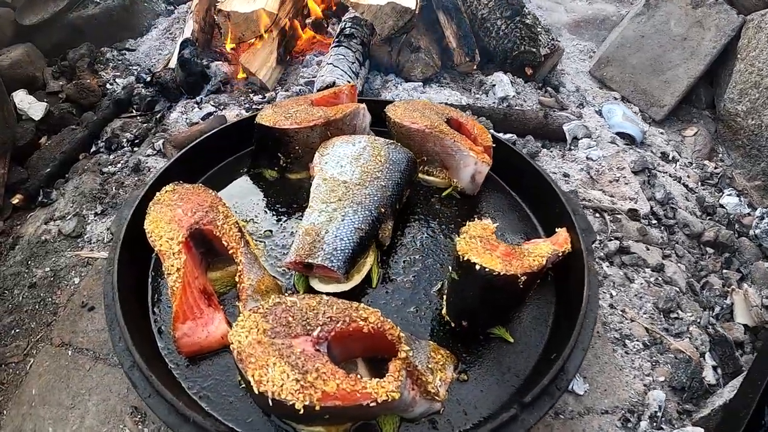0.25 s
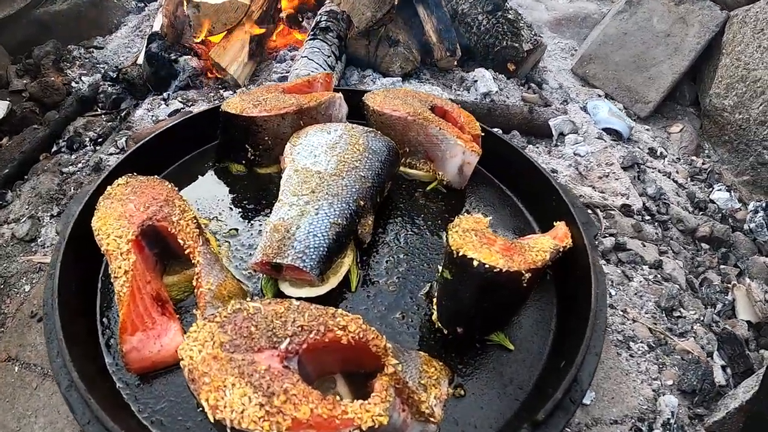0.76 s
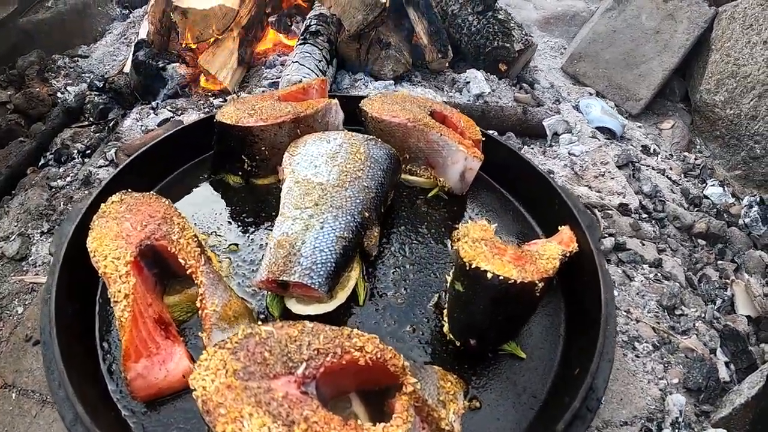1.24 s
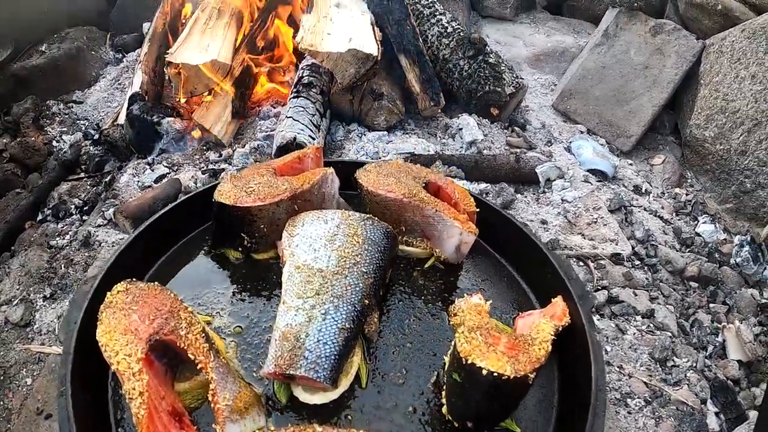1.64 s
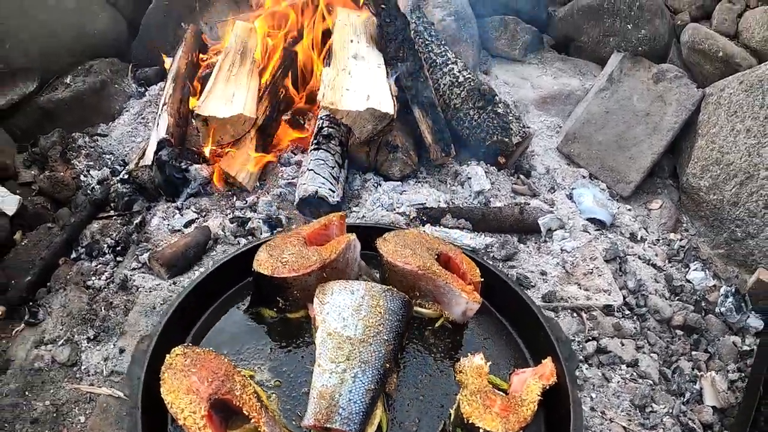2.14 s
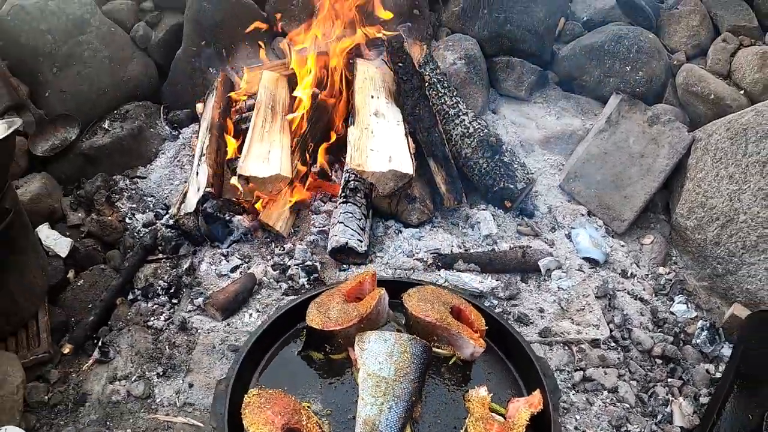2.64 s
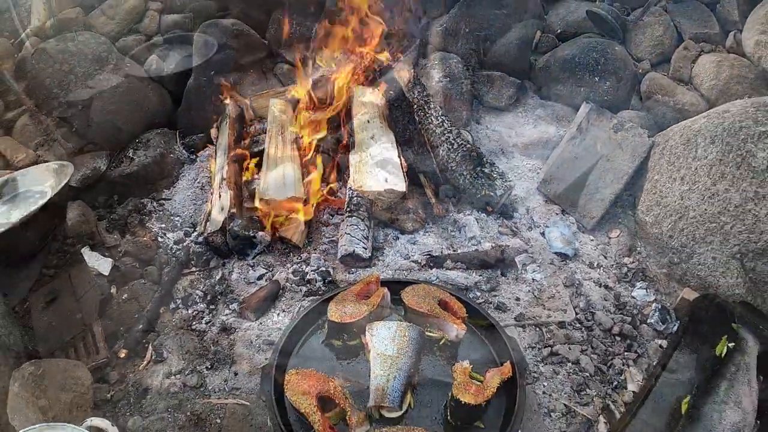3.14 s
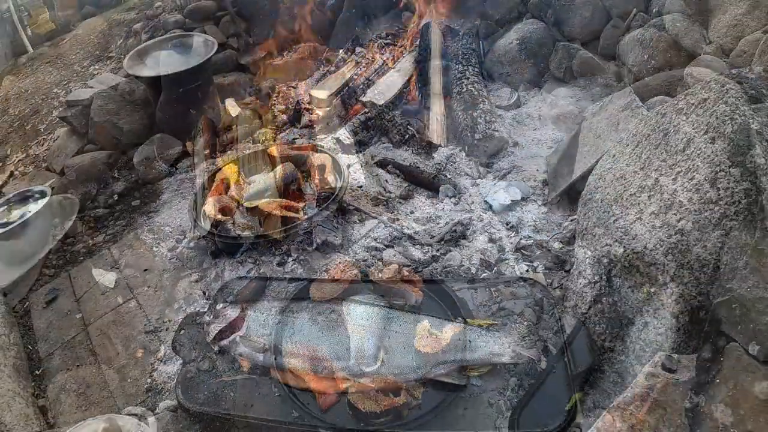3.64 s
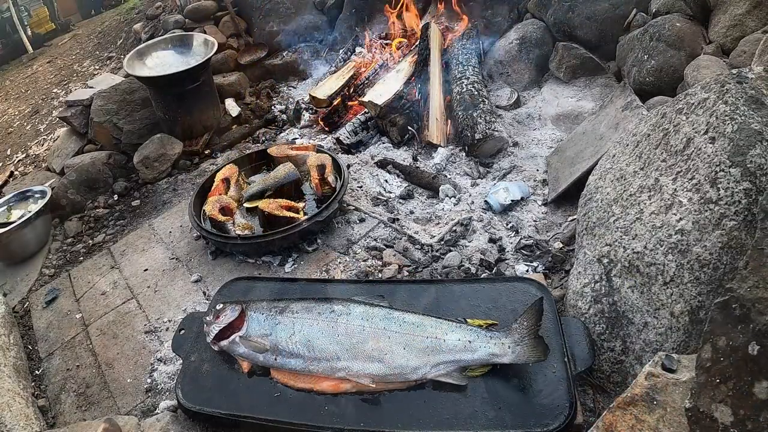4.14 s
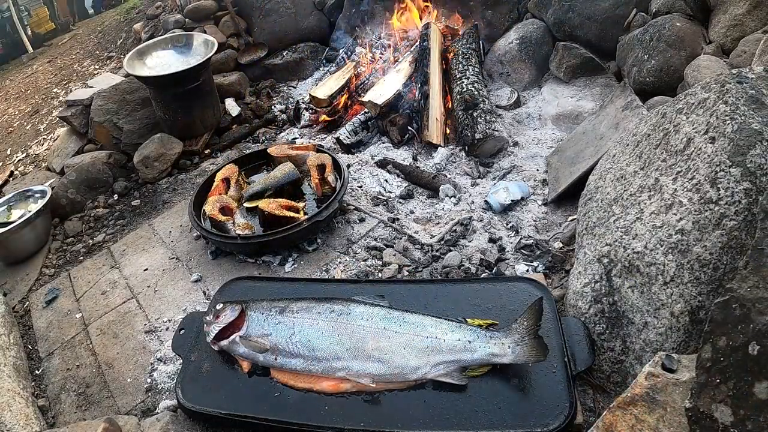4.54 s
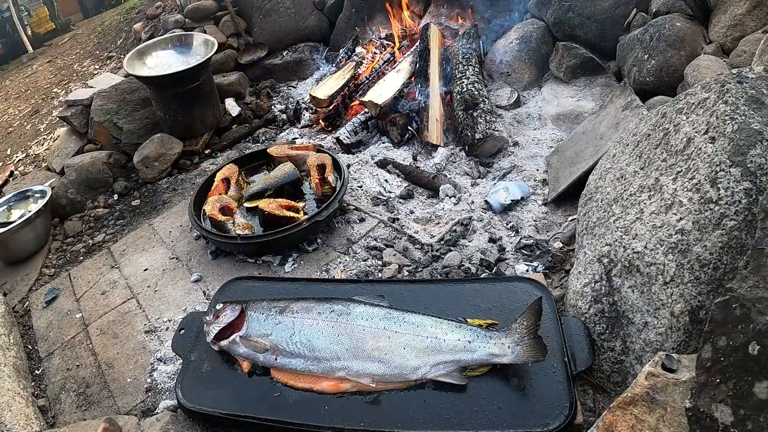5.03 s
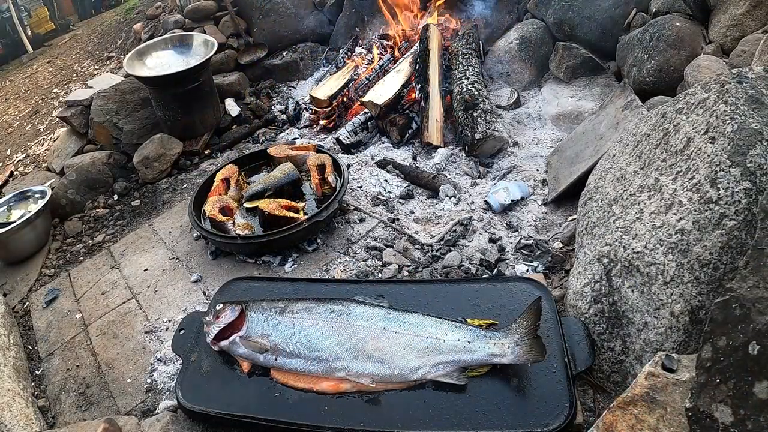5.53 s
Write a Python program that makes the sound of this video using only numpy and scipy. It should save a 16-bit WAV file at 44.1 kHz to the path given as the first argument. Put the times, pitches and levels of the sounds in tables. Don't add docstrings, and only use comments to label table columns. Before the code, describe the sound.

Fish fries in a pan beside a wood fire outdoors, picked up closely by a small stereo microphone. A dense, bright sizzle runs the full 5.8 seconds, grainy with bursting bubbles and brief flurries of spitting fat. Low wind and flame flutter rumbles underneath, with stronger flaps near 0.2, 1.5, 2.0 and 4.6 s. A crisp pop lands at 0.4 s, then small spits tick until a snap at 1.7 s. Pops gather at 2.7-2.85 s, and at 3.04 s a huge, clipped crack bursts with a tiny high squeak; the sound ducks sharply, then recovers. From about 3.7 to 4.5 s the scene fades closer to the logs. Bright snaps cluster at 4.3-4.45 s, a faint low squeak comes at 4.6 s, and steam hiss swells from 4.5 s, with narrow whistling jets near the end. Woody pops follow at 5.45 s and a loud one at 5.69 s.

```python
import sys
import numpy as np
from scipy import signal
from scipy.fft import rfft, irfft
from scipy.io import wavfile
from scipy.ndimage import uniform_filter1d

SR = 44100
rng = np.random.default_rng(int(sys.argv[2]) if len(sys.argv) > 2 else 0)


def generate_wav(signal):
    frames = np.transpose(np.atleast_2d(signal))
    scaled = np.clip(frames, -1, 1) * 32767
    pcm = np.round(scaled).astype(np.int16)
    wavfile.write(sys.argv[1], SR, pcm)


def elevation(decibels):
    levels = np.asarray(decibels, float)
    return 10 ** (levels / 20)


N = 254898


def fry():
    # hz, density_db (per Hz)
    fry_colour = [(180, -33), (300, -13.5), (793, -13), (987, -5), (1110, -5), (1290, 3), (1800, -0.5),
                  (1960, 2.5), (2170, -0.5), (2840, 2), (4030, 0.5), (4610, 0.5), (12000, -16.5),
                  (15400, -25), (16500, -68)]
    level_db, bright_db, low_db = pan_controls()
    low_db = np.minimum(low_db, -7) + 20.5
    bed = hiss(fry_colour, bright_db, low_db, flicker_db=1.07, apart=0.54 + 0.12 * first_view())
    bed = bed / np.std(band(bed[0], 760, 9400, order=4))

    s, pitch, cycles, turn, size, pan = rng.random(size=(1400, 6)).T[:, :, None]
    hz = 1800.0 * 5.0 ** pitch
    bubble_db = -1.5 + 1.2 * np.log2(hz / 3000) + np.minimum(-4.0 * np.log(size), 13)
    blips = wavelet(hz, 0.5 + 1.13 * cycles, turn, size=96) * elevation(bubble_db)
    side_db = 7.5 * (pan - 1.0)
    left = scatter(s * N / SR, blips * elevation(side_db))
    right = scatter(s * N / SR, blips * elevation(-side_db))
    return elevation(level_db + 1.5) * (bed + np.array([left, right]))


def pan_controls():
    # time_s, sizzle_db, brightness_db_per_octave, low_end_db
    drift = [(0, -41, -4.5, -13), (1.0, -41, -1.5, -13.5), (1.7, -40.5, -2, -5.5), (2.3, -42, -2, -28),
             (3.0, -42, -5, -36), (3.25, -42.5, -3, -30), (3.7, -44, -8, -23), (4.3, -42.5, -3, -17),
             (5.0, -43.5, 0, -19.5), (5.78, -43.5, 2, -18)]
    # start_s, length_s, louder_db, brighter_db_per_octave, fuller_low_end_db
    flurries = [(0.0, 0.038, 2.5, 0, 16.5), (0.486, 0.026, 0.5, -3, 10), (1.37, 0.046, 0.5, 3, 7),
                (1.454, 0.058, 0, 0, 13), (1.724, 0.057, 1, 2, 10), (1.962, 0.025, 1, 1, 1),
                (2.075, 0.056, 3, -2, 5), (3.39, 0.023, 5, 3, 20), (3.63, 0.025, 0, -7, 16),
                (4.405, .05, 1.5, 12, 3), (4.595, 0.021, 7.5, -4, 6), (5.052, 0.12, 2.5, 0, 6),
                (5.463, 0.054, 7, 4, 12), (5.66, 0.092, 0.5, 7, 4.5)]
    t = np.arange(N) / SR
    bumps = 0
    for s, length_s, *more in flurries:
        bumps = bumps + np.exp(-((t - s) / length_s) ** 2 * 2) * np.array(more)[:, None]
    level_db, bright_db, low_db = np.array(curve(drift)) + bumps
    return level_db + duck_db(), bright_db, low_db


def hiss(colour, bright_db, low_db, flicker_db, apart):
    hz = np.maximum(np.fft.rfftfreq(N, 1 / SR), 1)
    at_hz, db = np.transpose(colour)
    shape_db = np.interp(np.log(hz), np.log(at_hz), db, left=-70, right=-70)
    spec = rfft(rng.standard_normal((2, N))) * elevation(shape_db)
    out, shared = 0, walk(46)
    for centre in 330 * np.sqrt(2) ** np.arange(12):
        mask = np.cos(np.pi * np.clip(np.log2(hz / centre), -.5, .5)) ** 2
        direct, scattered = irfft(spec * mask, N)
        shared = 0.72 * shared + 0.64 * walk(30)
        tilt_db = bright_db * max(np.log2(centre / 4000), 0) + low_db * (centre < 600)
        level_db = flicker_db * (shared + 1.6 * walk(90)) + tilt_db
        wide = apart * np.clip((centre / 4000) ** 0.69, .4, 1.6)
        ports = (direct + wide * scattered * [[1], [-1]]) / np.sqrt(1 + wide ** 2)
        out = out + elevation(level_db) * ports
    return out


def pops():
    # delay_s, level_db
    echoes = [
        (.0013, -31),
        (.0031, -13),
    ]
    size = 1024
    t = np.maximum(np.arange(size) / SR - .0006, 0)
    s, peak_db, hz, thud_db, snap_db, cycles = all_pops().T[:, :, None]
    g = rng.standard_normal(size=(len(s), 6, size)) * (t > 0)

    thud_noise = to_peak(band(g[:, 4] * np.exp(-t / 0.0011), 250.0, 870.0))
    thud_tone = np.sin(2 * np.pi * 155 * t) * np.exp(-t / 0.0028)
    front = wavelet(hz, cycles, g[:, 5, -1:], size)
    front = front + elevation(thud_db + 6) * (0.81 * thud_noise - 0.94 * thud_tone)
    front = front + 0.16 * wavelet(hz / 2, 1.0, g[:, 5, -4:-3], size)
    front = front + 0.59 * wavelet(np.minimum(1.84 * hz, 9000.), 0.38, g[:, 5, -3:-2], size)
    front = front + elevation(snap_db + 16) * wavelet(6600.0, 0.48, g[:, 5, -2:-1], size)

    out = []
    for port in (0, 1):
        rough = 0.56 * g[:, 0] + 0.87 * g[:, 1 + port]
        ring = wavelet(0.97 * hz, 0.41, 0, size=96)
        tail = signal.fftconvolve(rough * np.exp(-t / 0.00088), ring, axes=1)[:, :size]
        fine = band(rough * np.exp(-t / 0.0023), 3700.0, 8800.0)
        pop = front + 0.28 * to_peak(tail) + elevation(snap_db + 2.5) * to_peak(fine)
        out.append(scatter(s + .0004, elevation(peak_db - 0.5) * pop))
    out = np.array(out)
    reflected = 0
    for delay_s, db in echoes:
        reflected = reflected + elevation(db) * band(np.roll(out, int(delay_s * SR), axis=1), 2800.0, 10000.0, order=1)
    return out + reflected


def all_pops():
    # start_s, peak_db, pitch_hz, thud_db, snap_db
    cracks = [(0.3904, -10, 4860, -23, -16.5), (1.7127, -15.5, 3140, -11, -38),
              (1.9034, -25.5, 3370, -39, 1.5), (2.7464, -14.5, 3660, -53, -18),
              (2.8483, -11.5, 4940, -47, -10.5), (3.0394, 4.5, 3250, -49, -29),
              (3.3832, -17.5, 3260, -18.5, -17), (3.6372, -12.5, 3470, -26.5, -22),
              (4.069, -21.5, 4100, -40, -20), (4.0902, -13, 9900, -50, -28),
              (4.3387, -11.5, 3100, -42, -19), (4.3962, -25, 4340, -30, -8),
              (4.4233, -8.5, 3700, -22.5, -13.5), (4.4263, -18, 9000, -36, -11),
              (4.594, -28.5, 1550, -12.5, -7.5), (4.7117, -17, 1610, -45, -16),
              (4.783, -19, 1930, -37, -14), (4.7923, -25.5, 2180, -36, -4), (5.2447, -18.5, 1920, -44, -38),
              (5.443, -10.5, 1840, -3.5, -17), (5.467, -21, 3520, -9, -8), (5.5052, -10.5, 4740, -47, -12),
              (5.5288, -27, 1830, -29, -7), (5.6856, -0.5, 3600, -35, -16)]
    # start_s, peak_db, pitch_hz, snap_db
    spits = [(0.0737, -29, 2860, -22), (0.448, -20, 3720, -20), (0.6928, -30, 2570, -10),
             (0.779, -22.5, 2600, -14), (0.9707, -28.5, 2960, 1), (1.054, -38, 1460, 0.5),
             (1.1044, -26, 3060, -20), (1.2435, -20, 3020, -26), (1.3328, -26, 3450, -7.5),
             (1.3494, -28, 3490, -3.5), (1.3604, -29, 4860, -5), (1.3765, -17, 4600, -14),
             (1.3865, -30, 9500, -5), (1.4377, -16.5, 5060, -24), (1.5434, -22.5, 3470, -22),
             (1.6267, -26, 1590, -9), (1.689, -30, 3160, -6), (1.75, -31, 3080, -6),
             (1.9397, -25, 2940, -9.5), (1.9681, -19, 5200, -15.5), (2.07, -24, 2100, -23),
             (2.251, -21, 3980, -9), (2.2806, -19.5, 2970, -17), (2.2968, -30, 1380, -8),
             (2.391, -34, 2030, -4), (2.7235, -14.5, 3340, -18), (2.7264, -22.5, 2480, -22),
             (2.7606, -29.5, 1780, -2.5), (2.804, -21, 2460, -17)]
    # start_s, peak_db,
    # pitch_hz
    ticks = [(2.5073, -23.5, 2000), (2.585, -27, 2760), (2.6323, -27, 2030), (2.6662, -27, 3500),
             (2.7697, -25, 2600), (2.886, -33, 3200), (3, -22, 3080), (3.1117, -33.5, 5060),
             (3.2178, -33, 4090), (3.357, -30.5, 1440), (3.475, -30.5, 1930), (3.5503, -38, 5500),
             (3.5995, -29.5, 2090), (3.687, -39, 1410), (3.7215, -36, 11000), (3.7435, -36, 8000),
             (3.901, -22, 7300), (3.9814, -25, 7100), (4.158, -34, 1380), (4.3388, -12, 11000),
             (4.383, -27, 2460), (4.4234, -6, 8500), (4.495, -27, 6000), (4.621, -28, 10500),
             (4.6858, -16.5, 9350), (4.85, -28, 8660), (5.3304, -17, 9340)]
    spit_thud_db, tick_thud_db, tick_snap_db = -27, -37, -38
    rows = list(cracks)
    rows += [(s, db, hz, spit_thud_db, snap_db) for s, db, hz, snap_db in spits]
    rows += [(s, db, hz, tick_thud_db, tick_snap_db) for s, db, hz in ticks]
    rows = np.array(rows)
    cycles = 0.6 + 0.0127 * (rows[:, 1] + 30)
    return np.column_stack([rows, cycles])


def steam():
    # time_s, steam_db, jets_db
    logs = [(3.6, -67.5, -76), (4.07, -57, -73), (4.52, -46.5, -71), (4.82, -47, -76), (4.98, -41.5, -45),
            (5.2, -38, -46), (5.52, -43.5, -49), (5.61, -38, -35.5), (5.78, -36.5, -41)]
    # hz, density_db (per Hz)
    steam_colour = [(1500, -38), (3000, -40), (5000, -3.5), (7000, -1), (9000, 4), (11000, 4),
                    (12500, -1.5), (14000, -8), (15300, -2), (15600, -37)]
    # centre_hz, width_hz, level_db
    jet_bands = [(4170, 660, 4.5), (2030, 490, -5), (8500, 420, -8), (9500, 200, -3), (10900, 390, -13),
                 (5700, 1800, 2)]
    level_db, jet_db = curve([(3.35, -91, -91)] + list(logs))
    broad = unit(hiss(steam_colour, 0, 0, flicker_db=.45, apart=.03))
    jets = 0
    for hz, width_hz, db in jet_bands:
        jet = unit(band(rng.standard_normal(N), hz - width_hz / 2, hz + width_hz / 2))
        jets = jets + elevation(db + 2.4 * walk(32)) * jet

    s, pitch, turn, size = rng.random(size=(700, 4)).T[:, :, None]
    droplet_db = 5.5 + np.minimum(-4.0 * np.log(size), 12)
    droplets = wavelet(6160.0 * 2.1 ** pitch, 1.0, turn, size=96) * elevation(droplet_db)
    sputter_db = 1.0 * walk(28) + 0.8 * walk(70)
    boiling = broad + scatter(s * N / SR, droplets)
    return elevation(level_db + 3.5 + sputter_db) * boiling + elevation(jet_db - 6) * jets


def squeaks():
    # start_s, length_s, pitch_hz, level_db
    whistles = [
        (3.026, 0.033, 7900, -34),
        (4.618, 0.035, 1864, -38.5),
    ]
    t = np.arange(N) / SR
    out = 0
    for s, length_s, hz, db in whistles:
        swell = np.sin(np.pi * np.clip((t - s) / length_s, 0, 1))
        out = out + elevation(db) * swell * np.sin(2 * np.pi * hz * t)
    return out


def wind():
    # time_s, level_db, left_minus_right_db, small_over_large_eddies_db
    gusts = [(0.0, -25.5, -12.5, 1.5), (0.11, -38, 0.5, -1.5), (0.45, -33.5, -3, -2.5),
             (1.22, -36.5, 1, -0.5), (2.27, -31, -2, -2), (2.53, -32.5, -16.5, 0.5), (2.56, -35.5, -4, 0),
             (2.9, -33, -21.5, 1), (3.54, -43, 2.5, -1.5), (4.18, -37, -2, 1), (4.28, -35.5, 2, -3),
             (4.92, -34, -2.5, 0), (5.09, -29, 3, 1.5), (5.13, -34, 0, 1.5), (5.3, -33, -2, 2),
             (5.47, -30.5, 3, -3.5), (5.62, -29.5, 6.5, 2), (5.78, -34, -1, -1)]
    gust_db, side_db, small_db = curve(gusts)
    flap_db, push_db = buffets()
    first, duck = first_view(), duck_db()
    deep_db = gust_db + 1.5 - 2.85 * first - small_db + 1.4 * walk(17)
    body_db = gust_db - 11 + 9.13 * first + 0.6 * small_db + 0.58 * flap_db + 0.4 * duck
    upper_db = gust_db - 25.5 + 9.3 * first + 1.3 * small_db + flap_db + 0.8 * duck
    side_db = 0.7 * side_db + push_db + 1.4 * walk(8.3)

    g = rng.standard_normal((3, 3, N))
    alike = .72 - 0.25 * first
    ports = np.sqrt(1 - alike) * g[:, 1:] + np.sqrt(alike) * g[:, :1]
    flutter = walk(18)
    deep = unit(band(ports[0], 11.1, 43.0)) * elevation(deep_db)
    body = unit(band(ports[1], 59.6, 126.1)) * elevation(body_db + 1.86 * flutter)
    upper = unit(band(ports[2], 147.5, 257.0, order=4)) * elevation(upper_db + 4.5 * flutter)
    return elevation(np.array([side_db, -side_db]) / 2) * (deep + body + upper)


def buffets():
    # start_s, louder_db, left_minus_right_db
    flaps = [(.029, -2, -2), (0.181, 13.5, -1), (.41, -2, -3), (.58, 7, -1), (1.38, 9, -2),
             (1.505, 12.5, -3), (1.8, 3, 1), (1.96, 18.5, -11), (2.089, 17, -9.5), (2.173, -1.5, 2),
             (2.379, 10, -2.5), (2.504, 3, -5.5), (2.65, 4, -3), (2.765, 1, -4), (2.863, 0, 0),
             (3.03, 10, -2), (3.36, 7, -4), (3.93, 12, -1), (3.58, 15, -3), (4.587, 27, 1), (4.86, 9.5, -1),
             (5.44, 0, 6), (5.682, 12.5, -2)]
    rise_s, fall_s = 0.0093, 0.042
    t = np.arange(N) / SR
    out = 0
    for s, *more in flaps:
        since = t - s - .01
        shape = np.exp(np.where(since < 0, since / rise_s, -since / fall_s))
        out = out + shape * np.array(more)[:, None]
    return out


def first_view():
    change_s, fade_s = 4.1, 0.86
    return np.clip((change_s - np.arange(N) / SR) / fade_s + .5, 0, 1)


def duck_db():
    since = np.arange(N) / SR - 3.042
    fast_db = -15.5 * np.exp(-(since / 0.12) ** 2)
    slow_db = -10 * np.exp(-np.abs(since) / 0.74)
    return (fast_db + slow_db) * np.clip(since / 0.0046, 0, 1)


def late(x, lag):
    return np.array([np.where(first_view() > .5, np.roll(x[0], lag), x[0]), x[1]])


def wavelet(hz, cycles, turn, size):
    t = np.arange(size) / SR - .0007
    return np.cos(2 * np.pi * (hz * t + turn)) * np.exp(-(hz * t / np.maximum(cycles, .2)) ** 2)


def scatter(s, shapes):
    at = (s * SR).astype(int) + np.arange(shapes.shape[1])
    return np.bincount(at.ravel(), shapes.ravel(), minlength=2 * N)[:N]


def curve(table):
    s, *columns = np.transpose(table)
    return [np.interp(np.arange(N) / SR, s, c) for c in columns]


def walk(rate):
    k = int(SR / rate)
    held = np.repeat(rng.standard_normal(N // k + 1), k)[:N]
    return 1.2 * uniform_filter1d(uniform_filter1d(held, k), k)


def unit(x):
    return x / np.sqrt(np.mean(x ** 2))


def to_peak(x):
    return x / np.abs(x).max(axis=1, keepdims=True)


def band(x, lo_hz, hi_hz, order=2):
    edges_hz = [lo_hz, min(hi_hz, .45 * SR)]
    return signal.sosfilt(signal.butter(order, edges_hz, "bandpass", fs=SR, output="sos"), x)


def scene():
    fire = late(pops(), 1) + squeaks() * elevation(duck_db()) + steam()
    return late(fry(), 2) + fire + wind()


def low_pass(x):
    return signal.sosfilt(signal.butter(12, 16680, fs=SR, output="sos"), x)


def record(dry):
    cut = signal.ellip(10, .2, 60, 15750, fs=SR, output="sos")
    mix = np.clip(signal.sosfilt(cut, dry), -1, 1)
    return low_pass(mix)


dry = scene()
out = record(dry)
generate_wav(out)
```